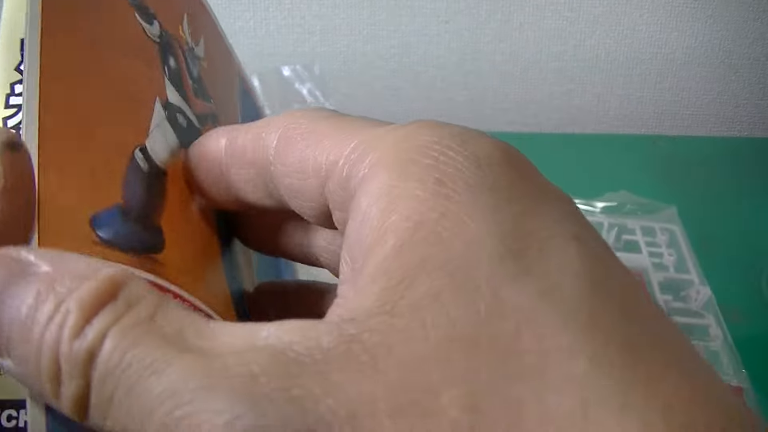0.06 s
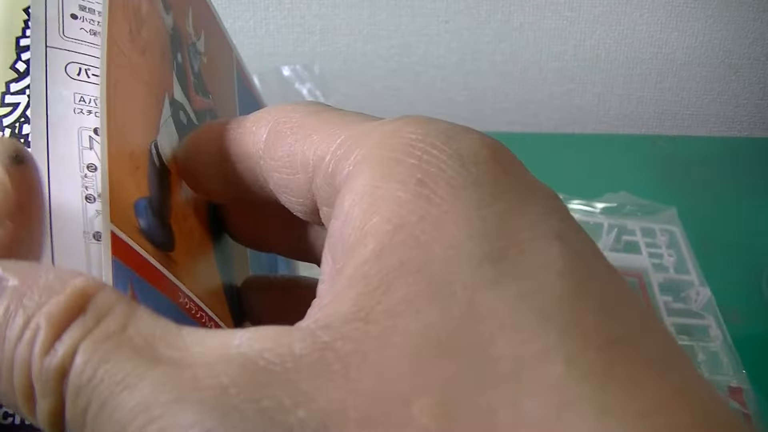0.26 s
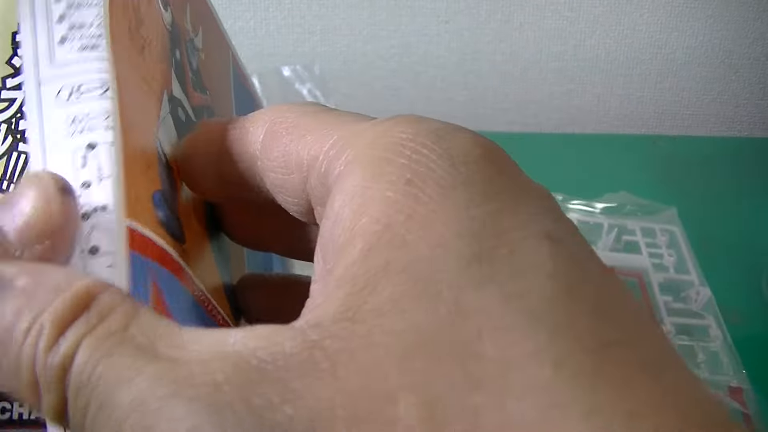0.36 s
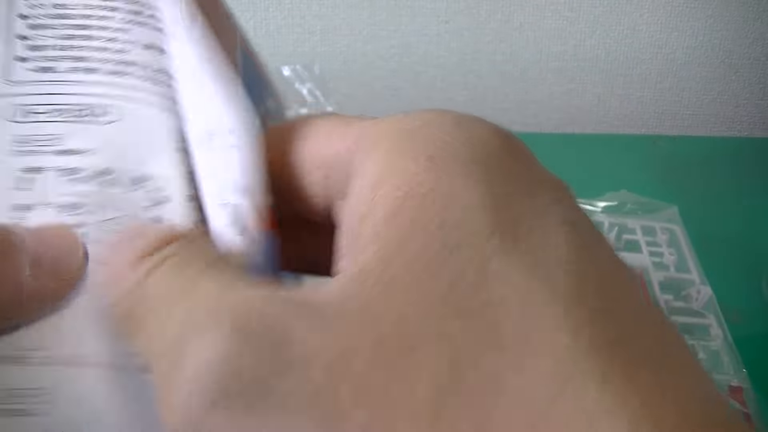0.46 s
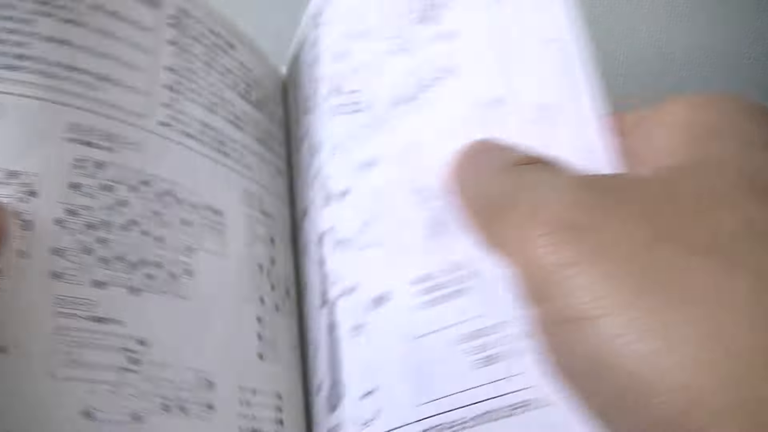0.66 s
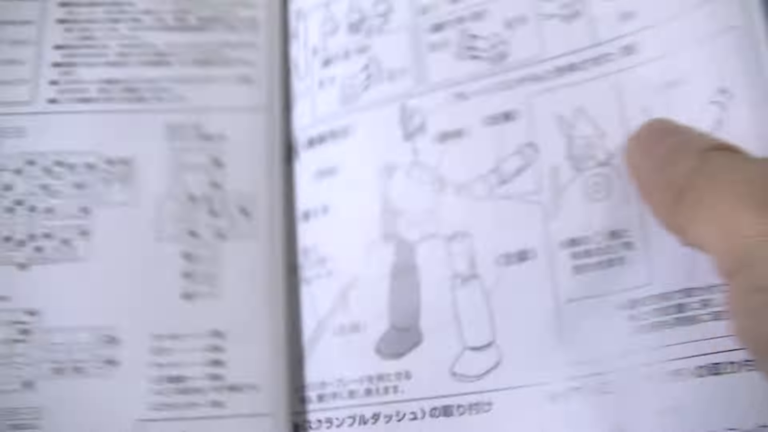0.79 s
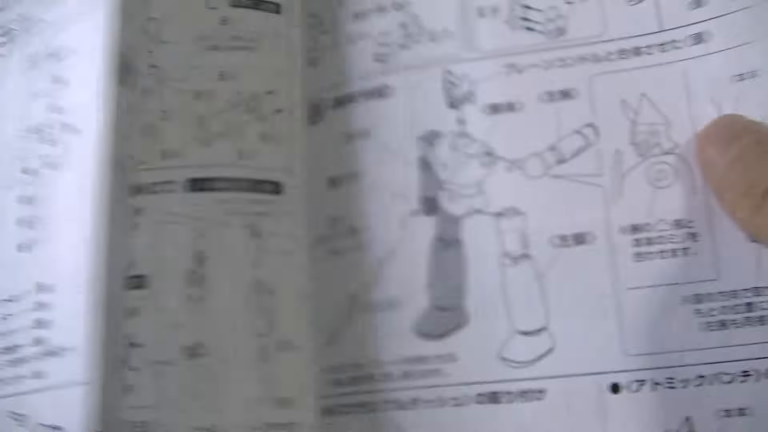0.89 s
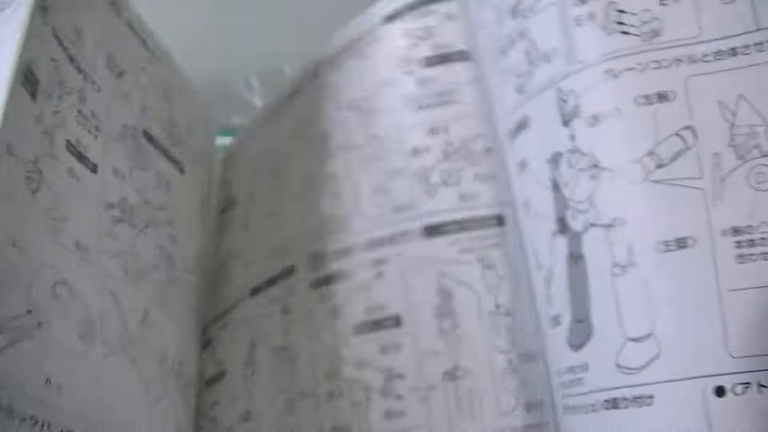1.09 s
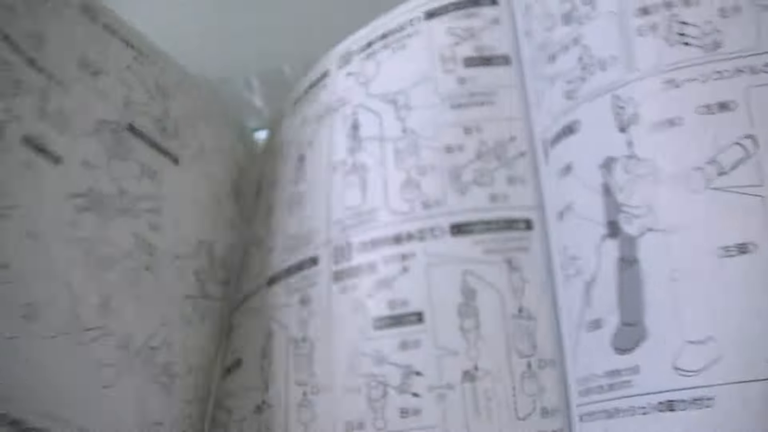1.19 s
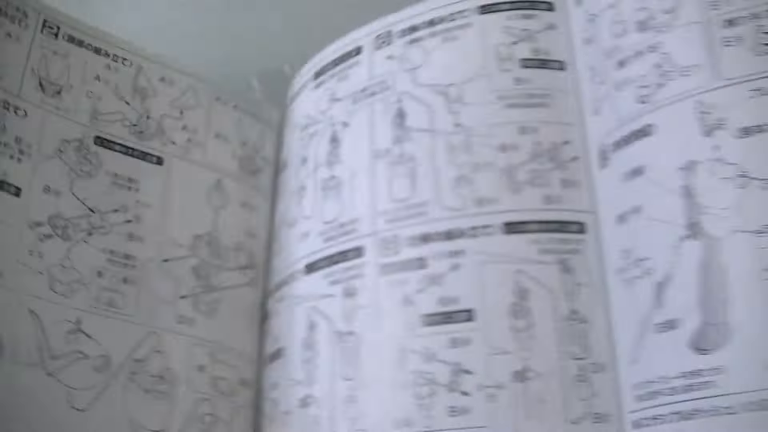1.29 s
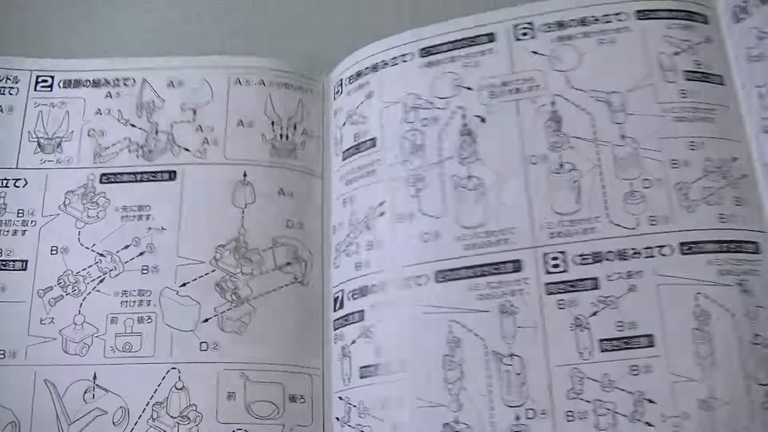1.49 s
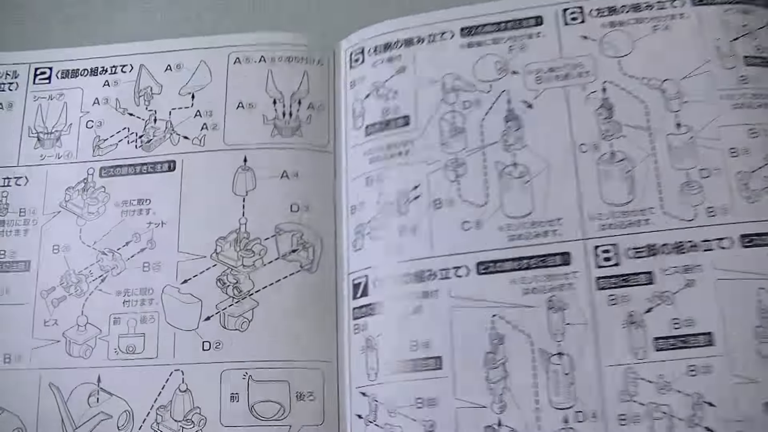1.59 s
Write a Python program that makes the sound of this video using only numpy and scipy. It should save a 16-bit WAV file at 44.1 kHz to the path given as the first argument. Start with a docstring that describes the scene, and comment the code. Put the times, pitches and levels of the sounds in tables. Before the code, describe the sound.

Close, dry paper rustling in a small quiet room: a stiff booklet ticks lightly, bursts open with a cluster of snaps, then leaves flop over with broad crinkles and soft air, settling to faint handling.

```python
"""In a quiet room, hands open a thin printed booklet and unfold a sheet close to a small stereo microphone.
The paper buckles in short snaps: bursts of noise ring at the pitch of the buckled patch.
It crackles while it bends (many tiny ringing clicks) and hisses where it slides over paper and skin.
Low noise that follows the bending is the push of air; a short echo and a faint room tone lie behind."""
import sys
import numpy as np
from scipy import signal
from scipy.fft import rfft, irfft, next_fast_len
from scipy.io import wavfile
from scipy.ndimage import uniform_filter1d

SR = 44100
rng = np.random.default_rng(int(sys.argv[2]) if len(sys.argv) > 2 else 0)


def transcribe(signal):
    """Save signal, clipped to [-1, 1], as a 16-bit WAV file at the path in sys.argv[1]."""
    frames = np.atleast_2d(signal).T
    limited = np.clip(frames, -1, 1)
    pcm = np.round(limited * 32767).astype(np.int16)
    wavfile.write(sys.argv[1], SR, pcm)


def rack_gain(trim_db):
    """Turn a fader trim in dB into the linear factor to multiply a signal by."""
    fader = np.asarray(trim_db, float)
    return 10 ** (fader / 20)


N = 72765   # samples, 1.65 s

SHUT_LOW_DB = -4   # thuds and air are weaker while the booklet is shut


# The sheet buckles, one snap a row; levels are relative:
# start_s, level_db, pitch_hz (of the buckled patch), crack_db (sharpness), ring_out_ms
BUCKLES = [(0.005, -17, 1900, 2, 3.2), (0.027, -15, 1760, -0.5, 1.1), (0.0663, -15.5, 1710, -27, 2.1),
           (0.161, -22, 1910, 1, 0.88), (0.218, -15.5, 1740, 6, 2.6), (0.318, -10.5, 1870, -3.5, 0.55),
           (0.444, -2, 1830, -19, 1.3), (0.4573, -4.5, 1730, -18, 0.98), (0.468, 0.5, 1880, -23, 1.95),
           (0.478, 0.5, 2100, 1.5, 0.45), (0.500, -4.5, 6600, -23, 1.7), (0.5063, -9.5, 800, 12, 3),
           (0.519, -4.5, 1980, -31, 1.7), (0.637, -20, 1400, -28, 3.2), (0.733, -17, 1300, -18, 2.3),
           (0.770, -16.5, 400, -42, 1.34), (0.814, -10, 1190, -39, 3.6), (0.8518, -4.5, 2230, -20, 2),
           (0.863, -5, 2900, -25, 3), (0.886, -9, 2630, 7, 1.4), (0.933, 1, 1980, -3, 2.6),
           (0.961, -16.5, 1630, -33, 3.2), (0.983, -12, 1740, -18, 2.8), (1.055, -8, 1130, 2.5, 2),
           (1.253, -15.5, 1360, -24, 1), (1.351, -23.5, 2720, 5, 6.8), (1.503, -10.5, 1710, -3.5, 1.2),
           (1.625, -23.5, 670, -35, 3.2)]


def snaps():
    """Each buckle is a dying rush of tiny slips ringing its patch, with a crack above and a soft thud below."""
    rise_ms, dull_slows = 1, 0.4   # rise at crack_db 0; dull buckles swell more slowly
    crack_hz, crack_width_hz, thud_hz = 3500, 8700, 390
    snap_db, crack_trim_db, thud_db = -3.5, -10, -12
    shut_width, open_width, widest_hz = 0.37, 0.75, 1400   # widths as a share of the pitch
    out = np.zeros(N + 4000)
    t_ms = np.arange(4000) / SR * 1000
    crack_band = signal.butter(2, crack_hz, "high", fs=SR, output="sos")
    for start_s, level_db, pitch_hz, crack_db, ring_out_ms in BUCKLES:
        opened = openness(start_s)
        width_hz = min(pitch_hz * (shut_width + (open_width - shut_width) * opened), widest_hz)
        slips = rng.standard_normal((3, len(t_ms)))
        patch = resonance(resonance(slips[0], pitch_hz, width_hz), pitch_hz, 2 * width_hz)
        crack = resonance(signal.sosfilt(crack_band, slips[1]), crack_hz, crack_width_hz)
        thud = resonance(resonance(slips[2], thud_hz, thud_hz), thud_hz, 2 * thud_hz)

        rise = 1 - np.exp(-t_ms / (rise_ms * rack_gain(-dull_slows * crack_db)))
        shape = rise * np.exp(-t_ms / ring_out_ms)
        shape = 0.5 * shape / shape.max()
        shape_rms = np.sqrt(np.mean(shape ** 2))
        bursts = [rms_one(part * shape) * shape_rms for part in (patch, crack, thud)]
        part_db = np.array([0, crack_db + crack_trim_db, thud_db + SHUT_LOW_DB * (1 - opened)])
        i = max(int(start_s * SR), 0)
        out[i:i + len(t_ms)] += rack_gain(level_db + snap_db + part_db) @ bursts
    return out[:N]


# A page bends, one swell and fade a row; levels are relative:
# peak_s, swell_ms, fade_ms, level_db, pitch_hz
BENDS = [(.010, 70, 65, -40.5, 1860), (0.069, 10.2, 16.6, -33, 682), (0.22, 22.7, 7.8, -29, 2041),
         (0.327, 16.3, 9, -32, 1933), (0.378, 27, 4.4, -29.5, 1890), (0.458, 52, 2.5, -21, 1805),
         (0.481, 6.6, 23, -29.5, 2302), (0.516, 25, 52.5, -22, 1896), (0.553, 5.7, 66, -28.5, 1640),
         (0.645, 51, 136, -40, 1617), (0.793, 29.4, 28, -30, 1010), (0.822, 12.9, 22, -17.5, 1593),
         (0.864, 20, 70, -21.5, 1897), (0.937, 7.1, 55, -18, 1971), (0.982, 14.4, 38, -23.5, 1500),
         (1.017, 16.3, 29.6, -19.5, 1500), (1.092, 58, 33.5, -22, 1260), (1.142, 34.5, 41, -29.5, 1116),
         (1.214, 4.3, 34, -35.5, 1088), (1.254, 36, 60, -37, 1500), (1.353, 3.8, 32, -29, 1500),
         (1.458, 135, 81, -37.5, 1698), (1.628, 11.5, 22, -40.5, 862)]
IDLE_BEND_DB = -49   # the hands never quite rest


def crackle():
    """Clumped grains ring a few cycles at pitches scattered round the pitch of the bend."""
    idle_pitch_hz, grains_per_s = 1500, 11000   # grain rate before clumping
    spread_db, ring_cycles, clumps_db = 3, 11.6, 1.5
    shut_octaves, open_octaves = 0.22, 0.55   # scatter of the pitch
    bends, idle = strokes(BENDS), rack_gain(IDLE_BEND_DB)
    level = bends.sum(axis=0) + idle
    bend_hz = (np.array(BENDS)[:, -1] @ bends + idle_pitch_hz * idle) / level

    # The chance of a grain wavers, so grains come in clumps
    born = rng.random(N) < grains_per_s * rack_gain(4 * drift(60)) / SR
    strength = rack_gain(spread_db * np.minimum(rng.exponential(1, N), 3))
    clicks = born * strength * rng.choice([-1, 1], N)

    # Deal each grain to the nearest of 26 pitches; those too high for the range stay silent
    pitches = np.geomspace(250, 4000, 26)
    shut = 1 - openness(np.arange(N) / SR)
    octaves = open_octaves - (open_octaves - shut_octaves) * shut * (1 - idle / level)
    grain_hz = bend_hz * 2 ** (octaves * rng.standard_normal(N))
    place = np.log(grain_hz / pitches[0]) / np.log(pitches[1] / pitches[0])
    dealt = np.maximum(np.round(place), 0)
    rings = np.zeros(N)
    for k, hz in enumerate(pitches):
        grains = clicks * (dealt == k) + 1e-18
        ring = resonance(resonance(grains, hz, hz / ring_cycles), hz, hz / 2)
        rings += ring / hz ** 0.57
    even = rings / np.sqrt(uniform_filter1d(rings ** 2, size=700) + 1e-20)   # steady loudness
    return level * rack_gain(clumps_db * drift(62)) * even


# Page slides on page or finger, one stroke a row; levels are relative: peak_s, swell_ms, fade_ms, level_db
SLIDES = [(.015, 34, 51, -49), (.221, 28, 11, -36), (.292, 7.7, 3.2, -37.5), (.325, 8.1, 6.6, -39),
          (.378, 16, 9.3, -42.5), (.457, 57, 4.4, -33), (.508, 57, 19, -25.5), (.600, 420, 170, -40),
          (.790, 116, 22, -35.5), (.875, 53, 79, -34), (1.080, 16, 26, -37.5), (1.160, 51, 49, -41),
          (1.245, 37, 37, -37), (1.353, 3.4, 32, -32), (1.455, 113, 85, -40.5), (1.625, 31, 32, -44.5)]
# Tone colour of the friction hiss: pitch_hz, level_db (relative, per Hz)
SLIDE_COLOUR = [(1760, -14), (3000, 5), (3860, 0), (8860, -4.5), (14000, -9)]


def slide():
    """Fine friction hiss with a slightly uneven grip."""
    idle_db, grip_db = -56.5, 2.8
    level = strokes(SLIDES).sum(axis=0) + rack_gain(idle_db)
    hiss = rms_one(colour(rng.standard_normal(N), SLIDE_COLOUR))
    return level * rack_gain(grip_db * drift(270)) * hiss


# Tone colour of the moving air: pitch_hz, level_db (relative, per Hz)
SWING_COLOUR = [(15, -54), (30, -19.5), (145, 3), (300, 3), (800, -1), (1100, -31)]


def swing():
    """Lumpy low push of air, trailing the bending."""
    swing_db, follows, lag_hz, lumps_db = -17, 0.71, 25, 2   # follows: power of the bending level
    keep = np.exp(-2 * np.pi * lag_hz / SR)
    bending = strokes(BENDS).sum(axis=0) + rack_gain(IDLE_BEND_DB)
    effort = signal.lfilter([1 - keep], [1, -keep], bending) ** follows
    shut = 1 - openness(np.arange(N) / SR)
    level_db = swing_db + SHUT_LOW_DB * shut + lumps_db * drift(18.4)
    return rack_gain(level_db) * effort * rms_one(colour(rng.standard_normal(N), SWING_COLOUR))


def echo(paper):
    """Desk and walls: a short dull dying scatter."""
    echo_db, die_away_s, centre_hz, width_hz = -13, 0.058, 730, 7340   # falls 60 dB in die_away_s
    t = np.arange(SR // 4) / SR
    tail = resonance(rng.standard_normal(len(t)), centre_hz, width_hz) * rack_gain(-60 * t / die_away_s)
    tail = tail / np.sqrt(np.sum(tail ** 2))
    return rack_gain(echo_db) * signal.fftconvolve(paper, tail)[:N]


# Tone colour of the quiet room: pitch_hz, level_db (relative, per Hz)
ROOM_COLOUR = [(25, 4), (354, 11), (489, -27), (2990, -67), (3720, 0.5), (16000, -35)]


def room_tone():
    """Steady faint noise of the room, shaped from white noise."""
    return rack_gain(-54.5) * rms_one(colour(rng.standard_normal(N), ROOM_COLOUR))


# How wide the stereo is: pitch_hz, level_db (side signal against mid)
WIDTH = [(60, -15), (380, -19.5), (2380, -17.5), (15000, -2)]


def stereo(mid):
    """The two ports differ by briefly scattered copies that wander at random, more so in the treble."""
    left_db, scatter_ms, wander_hz = 0.8, 1, 10   # left up, right down by left_db
    t_ms = np.arange(600) / SR * 1000
    scatter = rng.standard_normal((2, len(t_ms))) * np.exp(-t_ms / scatter_ms)
    smears = irfft(np.exp(1j * np.angle(rfft(scatter))))   # scatter the timing, leave the tone colour
    turn = np.pi * drift(wander_hz)
    first = np.cos(turn) * signal.fftconvolve(mid, smears[0])[:N]
    second = np.sin(turn) * signal.fftconvolve(mid, smears[1])[:N]
    side = colour(first + second, WIDTH)
    return rack_gain(left_db * np.array([[1], [-1]])) * np.array([mid + side, mid - side])


def strokes(rows):
    """One swell and fade a row."""
    peak_s, swell_ms, fade_ms, level_db = np.array(rows)[:, :4].T[:, :, None]
    late_ms = (np.arange(N) / SR - peak_s) * 1000
    away = np.where(late_ms < 0, -late_ms / swell_ms, late_ms / fade_ms)
    return rack_gain(level_db) * np.clip(1 - away, 0, 1) ** 1.37


def openness(time_s):
    """Near 0 while the stiff booklet is shut (narrow crackle, little air), near 1 once it lies open."""
    opens_s, opening_s = 0.53, 0.0093
    return 1 / (1 + np.exp((opens_s - time_s) / opening_s))


def rms_one(x):
    """Scale to an average (rms) level of 1."""
    return x / np.sqrt(np.mean(x ** 2) + 1e-20)


def colour(x, points):
    """Filter by (pitch_hz, level_db) points, joined by straight lines over log pitch."""
    size = next_fast_len(N + 4096)
    hz, db = np.transpose(points)
    f = np.maximum(np.arange(size // 2 + 1) * SR / size, 1)
    gain = rack_gain(np.interp(np.log(f), np.log(hz), db))
    return irfft(rfft(x, size) * gain, size)[..., :N]


def drift(rate_hz):
    """Random wavering made by smoothing noise twice, scaled to rms 1."""
    r = np.exp(-2 * np.pi * rate_hz / SR)
    smooth = signal.lfilter([1], [1, -2 * r, r * r], rng.standard_normal(N + 9000))
    return rms_one(smooth[9000:])   # skip the filter's start


def resonance(x, hz, width_hz):
    """Two-pole band-pass with a gain of about 1 at its peak."""
    r = np.exp(-np.pi * width_hz / SR)
    poles = [1, -2 * r * np.cos(2 * np.pi * hz / SR), r * r]
    return signal.lfilter([(1 - r * r) / 2, 0, (r * r - 1) / 2], poles, x)


def scene():
    """Paper, its echo, the push of air and the room tone, spread to stereo."""
    paper = snaps() + crackle() + slide()
    return stereo(paper + echo(paper) + swing() + room_tone())


def low_pass(x):
    """Removes everything above the highest recorded frequency."""
    return signal.sosfilt(signal.butter(12, 16200, fs=SR, output="sos"), x)


def record(dry):
    """The microphone capsules roll off the top above about 9500 Hz."""
    roll_off = signal.butter(2, 9500, fs=SR, output="sos")
    mix = signal.sosfilt(roll_off, dry)
    return low_pass(mix)


dry = scene()
out = record(dry)
transcribe(out)
```